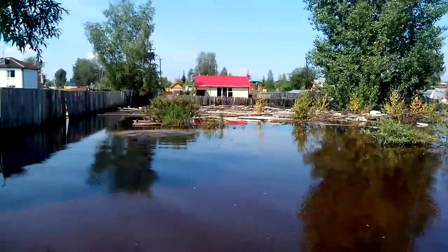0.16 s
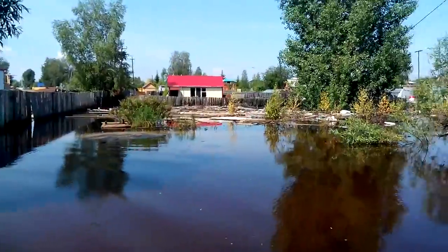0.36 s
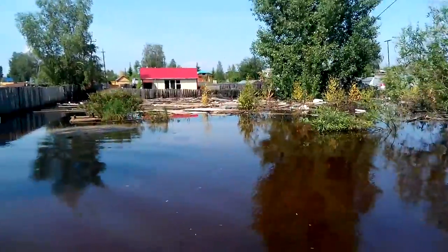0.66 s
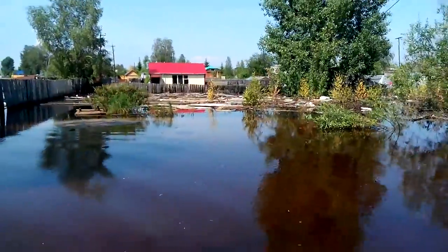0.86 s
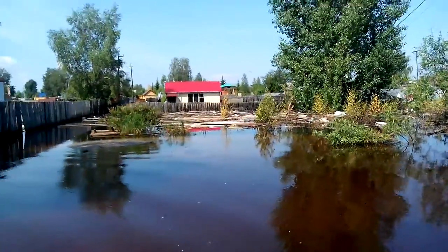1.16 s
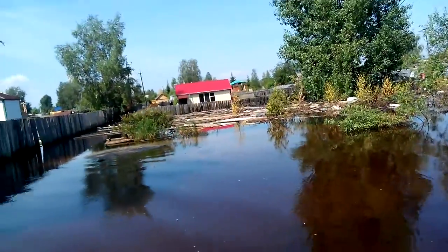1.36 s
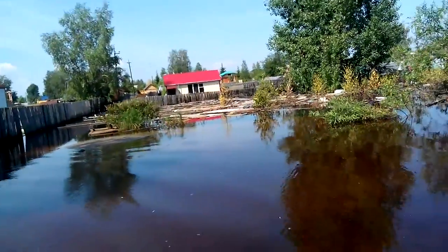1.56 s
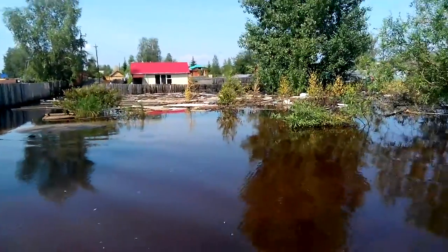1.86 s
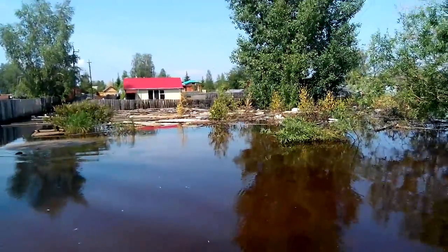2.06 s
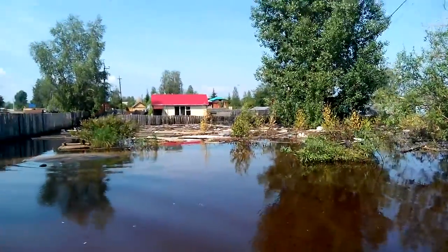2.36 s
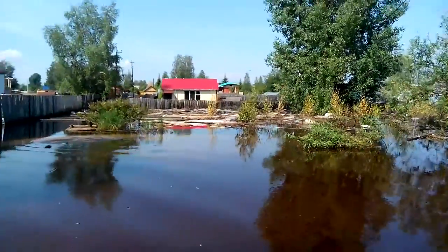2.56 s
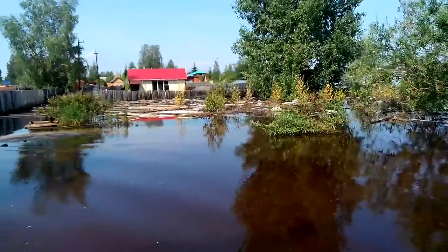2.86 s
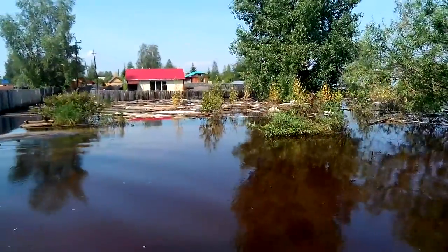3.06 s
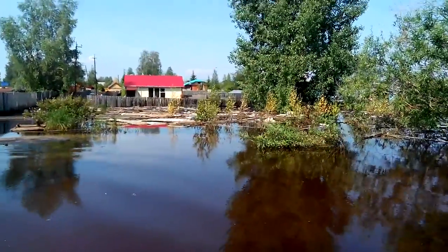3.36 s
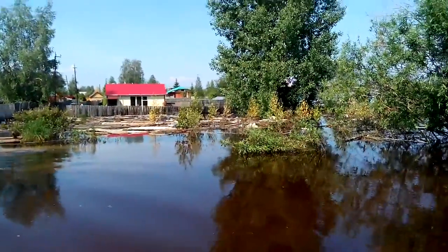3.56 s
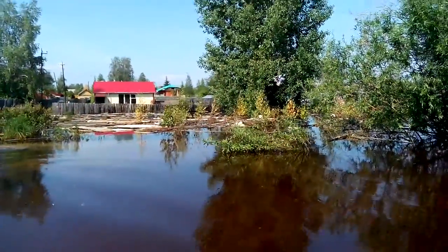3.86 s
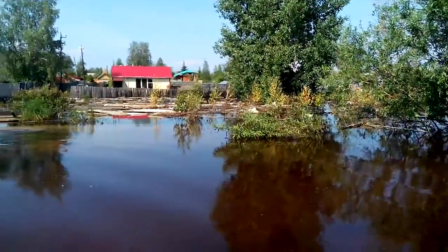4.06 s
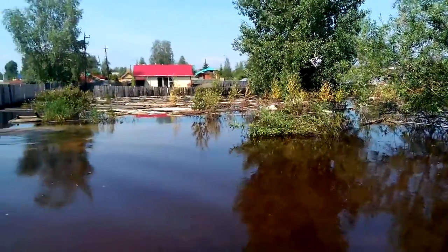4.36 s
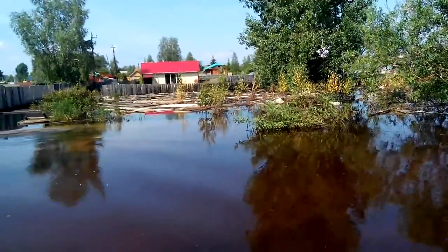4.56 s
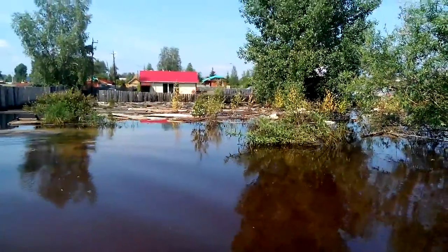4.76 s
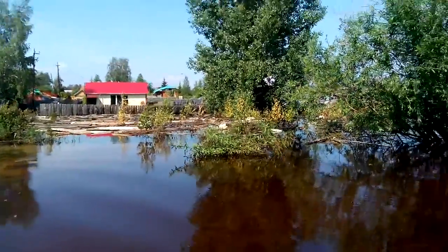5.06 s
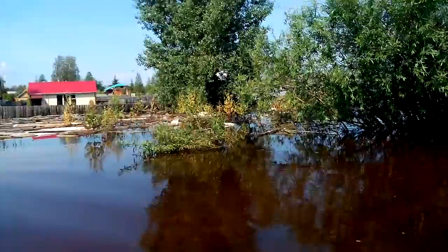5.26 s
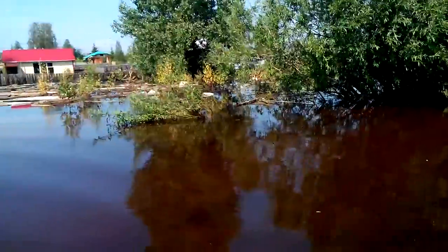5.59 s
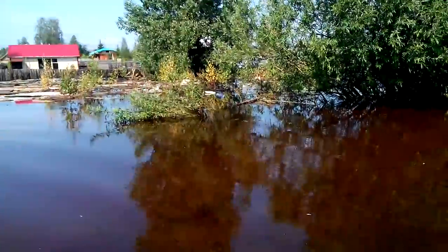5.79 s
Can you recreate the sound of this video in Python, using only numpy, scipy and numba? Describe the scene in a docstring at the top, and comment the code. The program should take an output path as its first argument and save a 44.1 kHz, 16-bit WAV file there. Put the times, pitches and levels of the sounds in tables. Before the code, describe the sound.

For about six seconds, someone wades through knee-deep floodwater outdoors, heard from close above the surface. A splash swells and collapses right at the start, and more follow in an even rhythm at roughly 0.8, 1.6, 2.4, 3.2, 3.9, 4.7 and 5.4 seconds. They alternate in strength: those at the start and near 1.6, 3.2 and 4.7 seconds throw brighter, fizzier spray, while the others are softer sloshes. Between the splashes a leg plunges in with a low, bubbly gulp, at about 0.6, 1.3, 2.1, 2.9, 3.6, 4.4 and 5.2 seconds, with a weaker one at the end. Water falls back in short washes, with small slaps, slurps, plops and stray drips. Sharp, high droplet plinks stand out near 4.1 and 4.7 seconds. A very short, thin echo and a faint steady hiss lie behind the water.

```python
"""A splash swells and collapses, then a low gulp: someone wades through knee-deep floodwater in the open
air, a stride every three quarters of a second. Each leg plunges with a gulp of large bubbles, churns the
surface and throws spray that patters back. The water is mostly ringing air pockets, the larger the lower,
with droplet impacts and slaps. A small hand-held camera hears it from just above, with a thin echo
and a faint hiss."""
import sys
import numpy as np
from scipy import signal
from scipy.fft import rfft, irfft
from scipy.io import wavfile
from numba import njit

SR = 44100
rng = np.random.default_rng(int(sys.argv[2]) if len(sys.argv) > 2 else 0)


def wrap_up_sound(samples):
    """Save the sound to the file named by the first command line argument, as 16-bit audio."""
    columns = np.atleast_2d(samples).T
    # keep every value between -1 and 1, then stretch to whole-number steps
    tamed = np.clip(columns, -1, 1)
    steps = np.round(tamed * 32767).astype(np.int16)
    wavfile.write(sys.argv[1], SR, steps)


N = 261513


def undb(db):
    """Decibels to gain."""
    return 10 ** (np.asarray(db) / 20)


def sum_db(levels_db):
    """Level of unrelated sounds together: their powers add."""
    return 10 * np.log10(sum(undb(db) ** 2 for db in levels_db))


def envelope_db(age_s, attack_db_s, hold_s, fall_db_s):
    """Climbs to 0 dB at age 0, holds, then sinks."""
    return attack_db_s * np.minimum(age_s, 0) - fall_db_s * np.maximum(age_s - hold_s, 0)


def unit(x):
    """Scale to rms 1."""
    return x / np.sqrt(np.mean(x ** 2))


def colour(x, points):
    """Filter through (freq_hz, gain_db) points; minimum phase keeps attacks sharp."""
    size = 4096
    hz, db = np.transpose(points)
    grid_hz = np.maximum(np.fft.rfftfreq(size, 1 / SR), 1)
    gain = undb(np.interp(np.log(grid_hz), np.log(hz), db))
    cepstrum = irfft(np.log(gain))
    cepstrum[1:size // 2] *= 2
    cepstrum[size // 2 + 1:] = 0
    impulse = irfft(np.exp(rfft(cepstrum)))
    return signal.fftconvolve(x, impulse)[:N]


def wander(rate_hz):
    """Smooth random drift with a spread near 1."""
    position = np.arange(N) / SR * rate_hz
    return 1.2 * np.interp(position, np.arange(4096), rng.standard_normal(4096))


def add(out, start_s, sound):
    """Mix a sound in at a time."""
    start = max(int(start_s * SR), 0)
    part = sound[:max(N - start, 0)]
    out[start:start + len(part)] += part


@njit
def ring(starts_s, hz, peaks, decay_cycles, rise, onset):
    """Bubbles: damped sines that swell over `onset` decay times and sharpen by `rise` per decay time."""
    out = np.zeros(N)
    envelope_peak = (onset / (1 + onset)) ** onset / (1 + onset)
    for k in range(len(starts_s)):
        start = max(int(starts_s[k] * SR), 0)
        decay_samples = decay_cycles[k] * SR / hz[k]
        phase = 0.
        for i in range(min(int(6 * decay_samples), N - start)):
            age = i / decay_samples
            phase += 2 * np.pi * hz[k] * (1 + rise * age) / SR
            envelope = np.exp(-age) * (1 - np.exp(-age / onset)) / envelope_peak
            out[start + i] += peaks[k] * envelope * np.sin(phase)
    return out


def cloud(count, low_hz, high_hz, decay_cycles, spread_db, rise):
    """A swarm of bubbles of all sizes in a range, many weak and a few strong."""
    when, pitch, strength, damping = rng.random((count, 4)).T
    hz = low_hz * (high_hz / low_hz) ** pitch
    cycles = decay_cycles * 2 ** (2 * damping - 1)
    rank = -np.log(1 - .97 * strength)
    peaks = undb(spread_db * rank) * hz / high_hz  # small bubbles end sooner, so peak higher
    return unit(ring(when * N / SR, hz, peaks, cycles, rise, onset=0.14))


def crackle(per_s, spread_db):
    """Tiny impacts of droplets on the surface."""
    hits = rng.random(N) < per_s / SR
    signs = rng.choice([-1, 1], N)
    sizes = np.minimum(rng.exponential(size=N), 4)
    return unit(hits * signs * undb(spread_db * sizes))


def flurries(per_s, decay_s):
    """Gain of water landing in clumps: each starts at once and dies away."""
    landings = (rng.random(N) < per_s / SR) * rng.uniform(0.51, 1, N)
    power = signal.lfilter([1], [1, -np.exp(-1 / (decay_s * SR))], landings)
    return unit(np.sqrt(power + 0.26))


def crest_db(age_s, rise_db_s, fall_db_s):
    """A wave swells to a rounded crest at age 0 and sinks."""
    round_s = 0.0089
    return (round_s - np.hypot(age_s, round_s)) * np.where(age_s < 0, rise_db_s, fall_db_s)


# Leg swings: crest_s, churn_db, spray_db, mist_db, rise_db_per_s, fall_db_per_s
LEG_SWINGS = [(0.14, -34.5, -31, -45.5, 25, 59.5), (.831, -36, -36.5, -55.5, 94, 40.5),
              (1.622, -33, -31.5, -46, 63, 47), (2.35, -35.5, -36.5, -61.5, 163, 47),
              (3.177, -32.5, -29.5, -44.5, 88, 80), (3.936, -34.5, -36.5, -55.5, 60, 59),
              (4.73, -32, -27.5, -42.5, 77, 62), (5.447, -35.5, -39, -59, 75, 76)]


def swings(t):
    """A swinging leg pushes a wave that swells and collapses. Yields gulp, churn, spray, mist in dB."""
    wake_db, mist_lag_s = -8.5, 0.033
    for crest_s, churn_db, spray_db, mist_db, rise, fall in LEG_SWINGS:
        wave = crest_db(t - crest_s, rise, fall)
        late_wave = crest_db(t - crest_s - mist_lag_s, rise, fall)  # the finest droplets land later
        settle = envelope_db(t - crest_s, attack_db_s=0, hold_s=0.21, fall_db_s=30)
        yield (churn_db + wake_db + 0.96 * wave + settle,
               churn_db + 0.83 * wave + settle,
               spray_db + wave + settle,
               mist_db + 1.06 * late_wave + settle)


# Spray spectrum: freq_hz, gain_db
SPRAY_SPECTRUM = [(300, -45), (1800, -1), (2900, -4), (3700, 2), (4700, -1.5), (5600, 0), (6400, 2.5),
                  (7100, -9.5), (8000, -11.5), (9200, -13.5), (12000, -43), (15500, -54)]


def spray(level_db):
    """Thrown water falls back as ticks and small bubbles; a heavy splash merges into a finer wash."""
    sparse = cloud(count=12000, low_hz=2543, high_hz=7355, decay_cycles=4.4, spread_db=6.5, rise=0.024)
    dense = cloud(count=24000, low_hz=2473, high_hz=7360, decay_cycles=5.8, spread_db=3.0, rise=0.014)
    dense_share = np.clip((level_db + 48) / 22, 0, 1)
    bubbles = np.sqrt(1 - dense_share) * sparse + np.sqrt(dense_share) * dense
    impacts = undb(2.5) * crackle(per_s=4500, spread_db=6.0)
    drops = unit(colour(bubbles + impacts, SPRAY_SPECTRUM))
    return drops * undb(level_db + 0.48) * flurries(per_s=55, decay_s=0.0081)


# Churned surface spectrum: freq_hz, gain_db
CHURN_SPECTRUM = [(100, -42), (400, -13.5), (700, -7.5), (1000, -0.5), (1800, 2.5), (2600, -1.5),
                  (3400, -3), (6000, -13), (15000, -68)]


def churn(level_db):
    """The bow wave folds over and traps middle-sized bubbles in quick surges."""
    bubbles = cloud(count=8000, low_hz=645, high_hz=3275, decay_cycles=4.7, spread_db=2.0, rise=0.066)
    impacts = undb(5.0) * crackle(per_s=2500, spread_db=-0.5)
    water = unit(colour(bubbles + impacts, CHURN_SPECTRUM))
    return water * undb(level_db + 0.5) * flurries(per_s=110, decay_s=0.0025)


# Large-bubble spectrum: freq_hz, gain_db
GULP_SPECTRUM = [(30, -53), (60, -11.5), (120, -13.5), (200, -8.5), (330, -1), (470, 3.5), (750, 2),
                 (1100, -1.5), (2500, -34), (8000, -64)]


def gulp(level_db):
    """Large pockets of air tumble in the wake of the legs."""
    bubbles = cloud(count=5500, low_hz=127.9, high_hz=956, decay_cycles=1.68, spread_db=5.0, rise=0.06)
    rush = undb(-10) * rng.standard_normal(N)
    return unit(colour(bubbles + rush, GULP_SPECTRUM)) * undb(level_db + 1.3)


# Mist spectrum: freq_hz, gain_db
MIST_SPECTRUM = [(1000, -32), (5000, -5), (6500, 7), (8000, -4), (10000, -7.5), (12500, -13.5),
                 (15500, -14)]


def mist(level_db):
    """Fine droplets prickle on the surface and leave a fizz of tiny bubbles."""
    fizz = cloud(count=2500, low_hz=7540, high_hz=12340, decay_cycles=7.1, spread_db=2.5, rise=0.0099)
    prickle = crackle(per_s=7900, spread_db=2.5)
    droplets = unit(colour(prickle + undb(-2.5) * fizz, MIST_SPECTRUM))
    return droplets * undb(level_db + 2.0 + 2.5 * wander(rate_hz=80))


# Background spectrum: freq_hz, gain_db
HISS_SPECTRUM = [(25, -24), (60, -14), (200, -27.5), (550, -2.5), (1500, -29), (3700, -4.5), (5300, -2),
                 (6500, -0.5), (7800, -23), (11000, -37), (15500, -39)]


def hiss():
    """Faint steady noise behind the water."""
    return undb(-57) * unit(colour(rng.standard_normal(N), HISS_SPECTRUM))


# Echo spectrum: freq_hz, gain_db
ECHO_SPECTRUM = [(150, -15), (1000, -12.5), (4000, -42), (9000, -18)]


def echo(water):
    """A thin, dull scatter comes back from fences and trees."""
    rt60_s, build_s = 0.16, 0.01
    t = np.arange(SR // 2) / SR
    tail = rng.standard_normal(len(t)) * undb(-60 * t / rt60_s) * (1 - np.exp(-t / build_s))
    tail /= np.sqrt(np.sum(tail ** 2))
    return colour(signal.fftconvolve(water, tail)[:N], ECHO_SPECTRUM)


# Loud bubbles, deep plops to plinks: start_s, pitch_hz, level_db, decay_cycles
LOUD_BUBBLES = [(.0971, 6300, -12, 2.7), (.1272, 1860, -19.5, 3.4), (.2305, 583, -27, 2.4),
                (.2854, 5550, -16.5, 1.7), (.5862, 550, -26.5, 1.8), (.6849, 630, -20.5, 0.91),
                (.9455, 1690, -25.5, 3.3), (.9685, 1090, -22.5, 4.3), (1.0, 1630, -36, 3.8),
                (1.002, 4700, -29, 4.4), (1.048, 940, -29.5, 3.8), (1.2416, 5670, -13.5, 5.2),
                (1.246, 1980, -29, 4.1), (1.2951, 1760, -26.5, 3.5), (1.4057, 460, -24.5, 1.8),
                (1.6329, 1220, -15.5, 1.9), (1.7579, 1730, -16, 1.26), (1.865, 3900, -20.5, 1.8),
                (1.8736, 2140, -21.5, 1.1), (1.977, 5500, -27, 1.4), (1.9866, 4340, -23.5, 1.4),
                (2.1198, 690, -25.5, 2), (2.1542, 508, -24.5, 1.8), (2.3655, 6530, -24, 0.74),
                (2.5941, 930, -22.5, 1), (2.8804, 1410, -23, 1.7), (2.8938, 1840, -25, 3.2),
                (2.9325, 2190, -29.5, 4.5), (2.9628, 422, -25, 3.6), (3.0021, 430, -22, 1.8),
                (3.1483, 3340, -21, 1.3), (3.4874, 6050, -24.5, 3.2), (3.523, 6140, -19, 1.6),
                (3.5956, 3460, -26.5, 3.9), (4.0374, 2170, -19.5, 1.8), (4.0729, 6350, -7.5, 1.6),
                (4.0985, 1940, -21, 2.3), (4.1347, 2620, -18, 2.7), (4.3861, 5720, -18, 3.8),
                (4.4, 1780, -30, 5.5), (4.7419, 6320, -4.5, 9.6), (4.926, 2610, -21, 2.7),
                (4.9705, 4170, -15, 0.58), (5.02, 6320, -14.5, 4.8), (5.2916, 2220, -26.5, 4.1),
                (5.3706, 2050, -22, 3.3), (5.3896, 5830, -22, 1.5), (5.4233, 2190, -19, 2.3),
                (5.9122, 643, -23.5, 2.3)]
# Closing tick spectrum: freq_hz, gain_db
TICK_SPECTRUM = [(300, -38), (1800, -18), (3000, -5.5), (4700, -1.5), (5600, -0.5), (6400, -1),
                 (7100, -6.5), (8500, -22.5), (12000, -31), (15500, -38)]


def single_bubbles(rows=LOUD_BUBBLES):
    """The surface closes with a short tick and the trapped bubble rings."""
    starts_s, hz, level_db, decay_cycles = np.array(rows, float).T
    rings = ring(starts_s, hz, undb(level_db - 2), decay_cycles, rise=0.0058, onset=0.44)
    t = np.arange(400) / SR
    ticks = np.zeros(N)
    for start_s, pitch_hz, gain in zip(starts_s, hz, undb(level_db)):
        hardness = pitch_hz / (pitch_hz + 3000)  # smaller bubbles tick harder
        tick = rng.standard_normal(len(t)) * np.exp(-t / 0.002)
        add(ticks, start_s, gain * hardness * tick)
    return rings + undb(4) * colour(ticks, TICK_SPECTRUM)


def drips(per_s=10, low_hz=1600, high_hz=6600):
    """Stray drops fall from the legs at random and leave faint bubbles."""
    when, pitch, strength, damping = rng.random((int(per_s * N / SR), 4)).T
    pitch_hz = low_hz * (high_hz / low_hz) ** pitch
    level_db = -41 + 9 * (strength - .5)
    decay_cycles = 4.6 * 2 ** (damping - .5)
    return single_bubbles(np.column_stack([when * N / SR, pitch_hz, level_db, decay_cycles]))


# Water falling back: start_s, hold_s, gulp_db, churn_db, spray_db
BACKWASH_BURSTS = [(0.19, 0.041, -44, -37.5, -35), (0.936, 0.12, -81, -64, -67),
                   (1.61, 0.017, -66, -40, -25.5), (1.7, 0.069, -49.5, -45, -36),
                   (2.565, 0.034, -57, -44.5, -53), (2.643, .02, -75, -52, -46.5),
                   (2.79, 0.077, -55.5, -54, -48.5), (3.392, .06, -79, -62, -43.5),
                   (3.517, 0.063, -51, -50, -52), (4.097, 0.085, -64, -42.5, -42.5),
                   (4.94, 0.078, -56, -43, -45.5), (5.106, 0.037, -51.5, -61, -50.5),
                   (5.63, .06, -55.5, -52.5, -50), (5.895, .04, -57, -42.5, -48)]


def backwashes(t):
    """Water falls back in a short wash. Yields gulp, churn, spray, mist in dB."""
    for start_s, hold_s, gulp_db, churn_db, spray_db in BACKWASH_BURSTS:
        wash = envelope_db(t - start_s, attack_db_s=500, hold_s=hold_s, fall_db_s=256)
        yield gulp_db + wash, churn_db + wash, spray_db + wash, spray_db - 17 + wash


# Surface slaps: start_s, decay_s, centre_hz, level_db
SURFACE_SLAPS = [(.531, .002, 2980, -37), (.5367, 0.0053, 2670, -33.5), (1.1755, .0024, 3920, -32.5),
                 (1.3105, 0.0042, 930, -31), (2.8701, 0.0016, 1240, -21), (3.597, 0.016, 1450, -37),
                 (3.683, .0056, 647, -34), (4.072, 0.002, 7000, -30), (4.352, .005, 2000, -38),
                 (4.3712, .002, 3640, -28), (4.4285, 0.0074, 774, -32.5), (5.8423, 0.0018, 2580, -35),
                 (5.8912, 0.0033, 1480, -32)]


def slaps():
    """The surface hits a leg or is hit by a sheet of water: a broad burst, gone in milliseconds."""
    out = np.zeros(N)
    t = np.arange(4096) / SR
    for start_s, decay_s, hz, level_db in SURFACE_SLAPS:
        band = [(hz / 12, -40), (hz / 2, -3), (hz, 0), (hz * 1.6, -4), (hz * 3, -26), (hz * 12, -60)]
        noise = rng.standard_normal(len(t)) * np.exp(-t / decay_s)
        burst = colour(noise, band)[:len(t)]
        onset_rms = np.sqrt(np.sum(burst ** 2) / (decay_s * SR / 2))
        add(out, start_s, undb(level_db) * burst / onset_rms)
    return out


# Leg plunges: start_s, entry_db, gulp_delay_s, gulp_length_s, gulp_db, first_pitch_hz, last_pitch_hz
LEG_PLUNGES = [(.532, -40, 0.11, .05, -37, 500, 383), (1.235, -39, 0.085, .1, -40, 480, 270),
               (2.057, -45, 0.059, 0.075, -38.5, 564, 400), (2.873, -40.5, .074, .06, -35.5, 530, 370),
               (3.59, -50.5, .025, 0.18, -40, 586, 377), (4.364, -40, .064, .13, -41.5, 625, 252),
               (5.101, -43, 0.12, .13, -41, 540, 397), (5.847, -58, .058, .04, -47.5, 680, 620)]


def plunges(t):
    """A leg breaks the surface, then drives down with a gulp. Yields gulp, churn, spray, mist in dB."""
    for start_s, entry_db, delay_s, length_s, gulp_db, _, _ in LEG_PLUNGES:
        age_s = t - start_s
        entry = entry_db + envelope_db(age_s, attack_db_s=1500, hold_s=0, fall_db_s=39)
        drive = gulp_db + envelope_db(age_s - delay_s, attack_db_s=800, hold_s=length_s, fall_db_s=64)
        yield sum_db([entry - 17.5, drive - 2.5]), entry, entry - 7, entry - 45


# Bubble string spectrum: freq_hz, gain_db
STRING_SPECTRUM = [(50, -11), (130, -6), (260, 2.5), (800, 0), (2500, -3)]


def bubble_strings(per_s=130):
    """A plunging leg's air cavity breaks into bubbles: the deeper the leg, the larger and lower."""
    out = np.zeros(N)
    for start_s, _, delay_s, length_s, gulp_db, first_hz, last_hz in LEG_PLUNGES:
        count = max(int(length_s * per_s), 2)
        jitter, detune, strength = rng.standard_normal((64, 3))[:count].T
        depth = np.clip((np.arange(count) + 0.281 * jitter) / count, 0, 1)
        starts_s = start_s + delay_s + depth * length_s
        hz = first_hz * (last_hz / first_hz) ** depth * 2 ** (0.37 * detune)
        decay_cycles = np.full(count, 1.3)
        string = ring(starts_s, hz, undb(3 * strength), decay_cycles, rise=0.013, onset=0.32)
        rms = np.sqrt(np.sum(string ** 2) / (length_s * SR))
        out += undb(gulp_db - 4.5) * string / rms
    return colour(out, STRING_SPECTRUM)


# Air cavities beside a leg: start_s, length_s, from_hz, to_hz, level_db
CAVITIES = [(.572, 0.052, 578, 458, -36.5), (0.656, 0.054, 327, 388, -29.5),
            (0.819, .024, 850, 1450, -29.5), (1.367, 0.058, 279, 204, -40), (2.57, 0.022, 440, 1010, -27.5),
            (3.174, .019, 1005, 1570, -23.5), (3.424, .02, 1830, 2900, -34),
            (3.965, 0.028, 570, 660, -26.5), (4.46, 0.032, 966, 850, -27), (4.577, .033, 210, 288, -34),
            (4.46, 0.05, 378, 235, -34.5), (4.958, 0.052, 280, 333, -38.5)]


def slurps():
    """A cavity's note falls as it deepens, rises as it is squeezed shut, and wavers with its ragged wall."""
    out = np.zeros(N)
    waver = 1 + 0.059 * wander(rate_hz=300)
    for start_s, length_s, from_hz, to_hz, level_db in CAVITIES:
        progress = np.linspace(0, 1, max(int(length_s * SR), 2))
        glide_hz = from_hz * (to_hz / from_hz) ** progress
        hz = glide_hz * waver[int(start_s * SR):][:len(progress)]
        note = np.sin(2 * np.pi * np.cumsum(hz) / SR)
        add(out, start_s, undb(level_db) * np.sin(np.pi * progress) ** 2 * note)
    return out * undb(1.96 * wander(rate_hz=160) - 3.5)


# Dull thumps: start_s, pitch_hz, peak_db
LEG_THUMPS = [(2.045, 126, -50), (2.092, 94, -50), (3.086, 115, -42), (3.168, 133, -35), (4.525, 191, -37)]


def thumps():
    """A leg shoves water aside; very large, heavily damped air pockets ring."""
    starts_s, hz, peak_db = np.array(LEG_THUMPS, float).T
    decay_cycles = np.full(len(hz), 0.9)
    return ring(starts_s, hz, undb(peak_db), decay_cycles, rise=0.027, onset=0.53)


def stride_levels():
    """Gulp, churn, spray and mist in dB per sample: all leg movements over a steady trickle."""
    control_samples = np.arange(0, N, 32)
    t = control_samples / SR
    trickle_db = [[-73], [-74], [-60], [-84]]
    layers_db = sum_db([trickle_db, *swings(t), *backwashes(t), *plunges(t)])
    return [np.interp(np.arange(N), control_samples, db) for db in layers_db]


def scene():
    """All the water sounds, the hiss and the water's echo, in mono."""
    gulp_db, churn_db, spray_db, mist_db = stride_levels()
    wash = gulp(gulp_db) + churn(churn_db) + spray(spray_db) + mist(mist_db)
    water = wash + bubble_strings() + slaps() + single_bubbles() + drips() + slurps() + thumps()
    return (water + hiss() + echo(water))[None]


def record(dry):
    """The camera cuts the top of the treble steeply."""
    cutoff_hz = 15700
    return signal.sosfilt(signal.ellip(10, .2, 70, cutoff_hz, fs=SR, output="sos"), dry)


dry = scene()
out = record(dry)
wrap_up_sound(out)
```